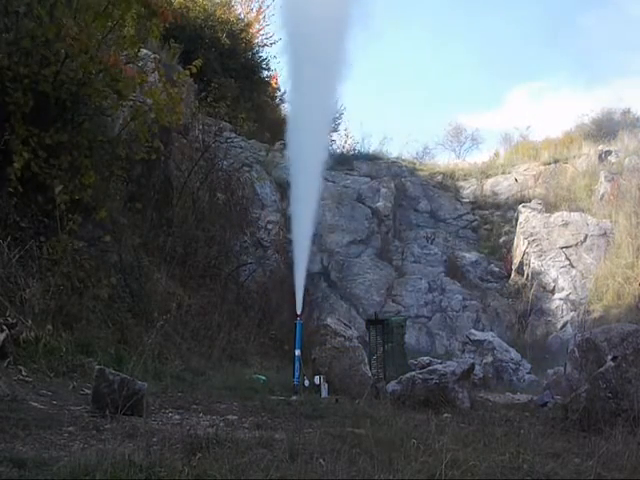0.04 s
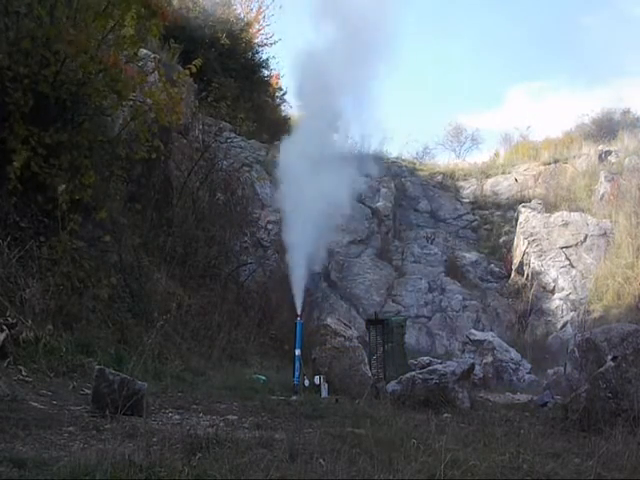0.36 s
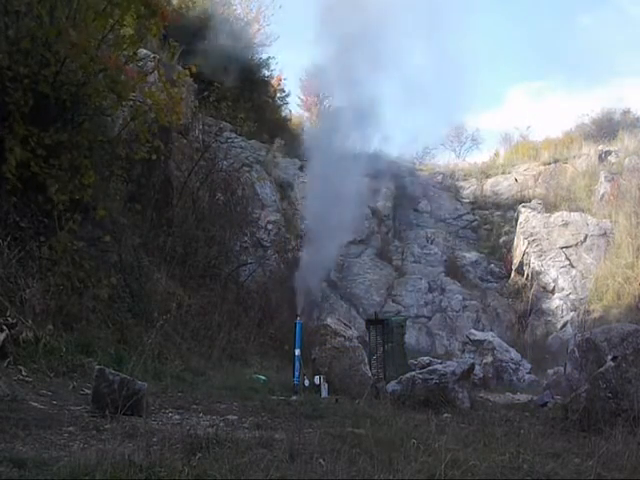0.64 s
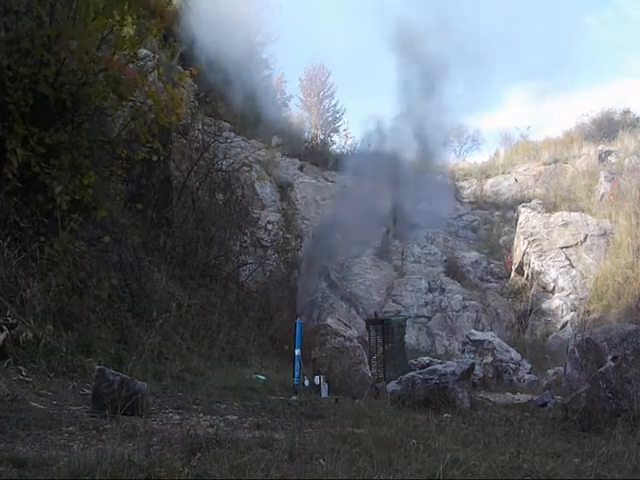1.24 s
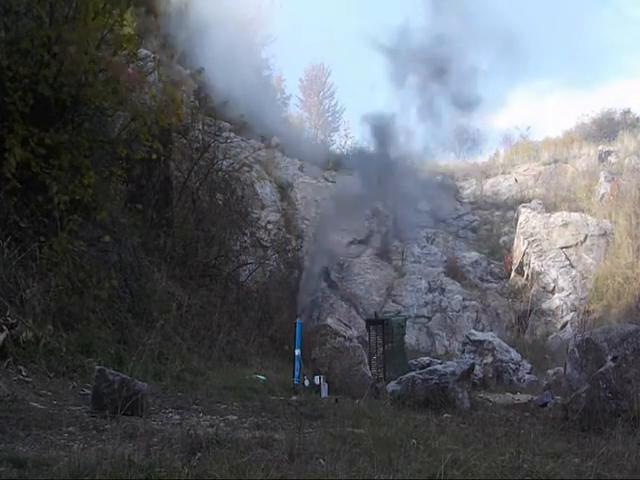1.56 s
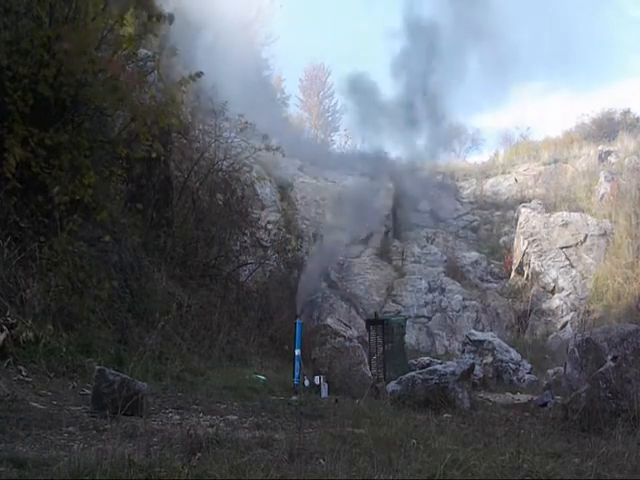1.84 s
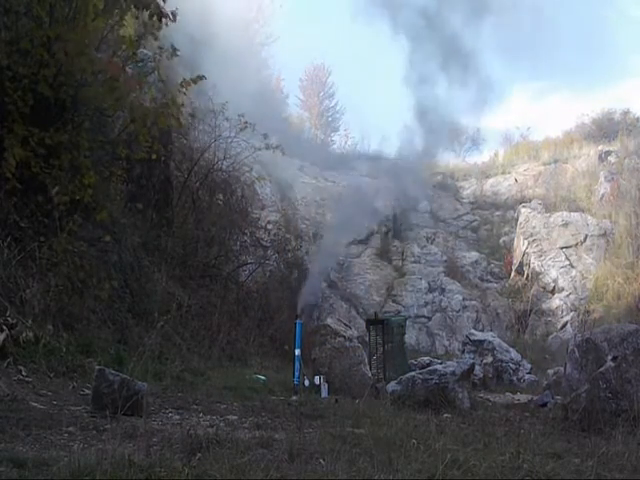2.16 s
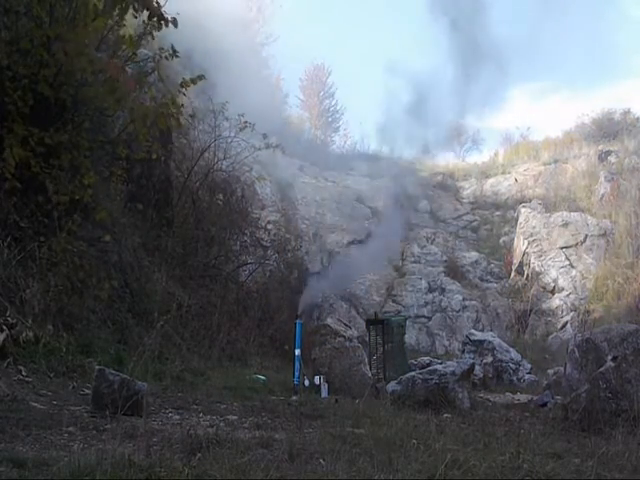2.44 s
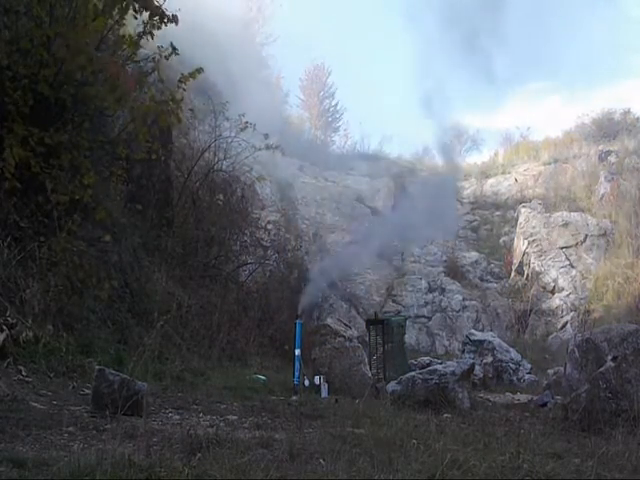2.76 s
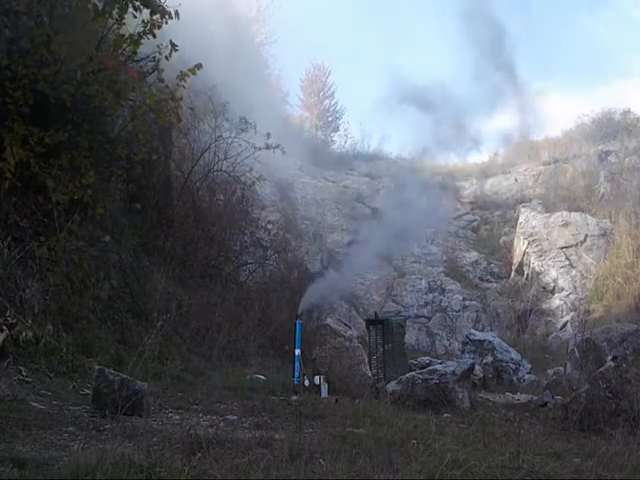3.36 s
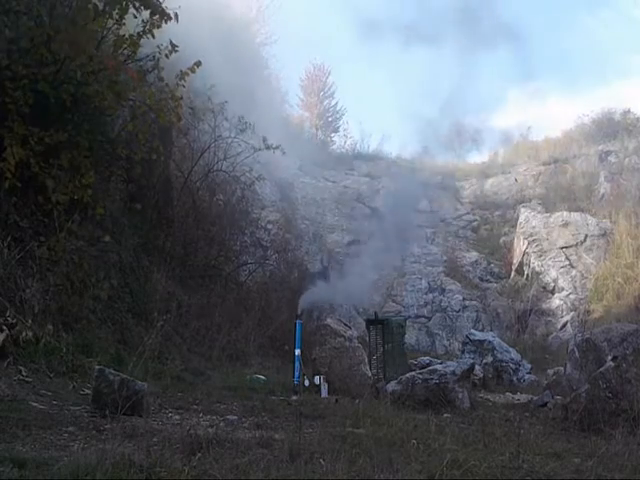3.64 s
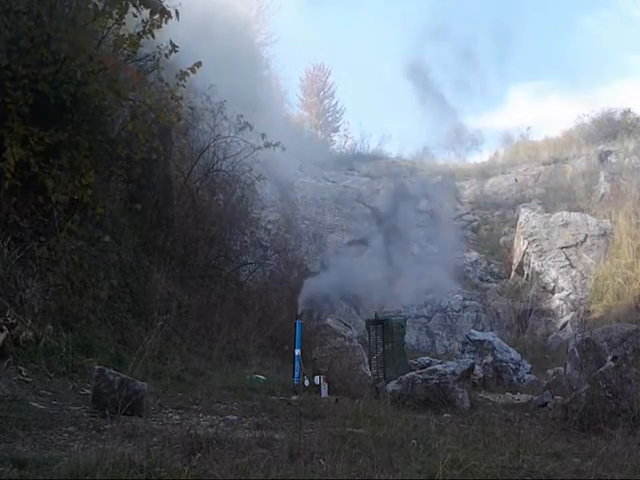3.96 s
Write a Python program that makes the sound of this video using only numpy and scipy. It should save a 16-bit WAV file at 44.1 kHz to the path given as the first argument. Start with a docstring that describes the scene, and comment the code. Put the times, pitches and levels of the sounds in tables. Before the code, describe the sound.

A small rocket motor roars for an instant, overloading the microphone, then drops to a wet, spitting spray. Vapour hisses on in weakening surges with dull puffs, a thin whistle and one quick knock, outdoors in a quarry.

```python
"""A small rocket motor, clamped nozzle-up in a quarry, blows down its tank.
Its jet roars, crackles with small shocks and overloads the microphone. The last liquid sprays
through the ringing nozzle, then vapour hisses out, sounding the hollow tube, with a thin whistle.
Low puffs and sharp spits break through, and something gives one quick double knock.
Ground and rock faces throw the jet and the knock back, over faint air and a low drone."""
import sys
import numpy as np
from scipy import signal
from scipy.fft import rfft, irfft
from scipy.io import wavfile

SR = 44100
rng = np.random.default_rng(int(sys.argv[2]) if len(sys.argv) > 2 else 0)


def wav_out(sig):
    """Save sig, one row per channel (or a flat mono array), as 16-bit PCM at SR to the path in sys.argv[1]."""
    wavfile.write(sys.argv[1], SR, np.round(np.clip(np.atleast_2d(sig).T, -1, 1) * 32767).astype(np.int16))


N = 176400
TIME_S = np.arange(N) / SR

# Full thrust: t/s, level/dB
THRUST_ENVELOPE = [(0, 0), (.04, -2), (.052, -3), (.064, -10.5), (.072, -4.5), (.135, -2), (.157, -9.5),
                   (.166, -2.5), (.228, -2.5), (.243, -16), (.27, -20), (.32, -36), (.38, -78)]
# Jet spectrum: f/Hz, level/dB
THRUST_SPECTRUM = [(24, -22), (40, -4), (98, -0.5), (212, -1.5), (247, -8.5), (333, -3.5), (472, -8),
                   (738, -4.5), (816, -5), (1050, -5.5), (1160, -4), (1520, -5), (1900, -7.5), (3060, -1.5),
                   (3290, -5), (4670, -3.5), (5420, -8), (6300, -2.5), (7680, -7), (9620, 0.5),
                   (15400, -18)]
# Deep body: t/s, level/dB
SURGE_ENVELOPE = [(0, -32), (.13, -34), (.158, -21), (.172, -7), (.2, -4.5), (.228, -9.5), (.25, -19),
                  (.3, -67)]
# Body spectrum: f/Hz, level/dB
SURGE_SPECTRUM = [(60, -6), (300, -9), (500, -23), (730, 2), (900, -4), (1400, -2), (1900, -10), (3000, -5),
                  (6000, -18)]
def roar():
    """The jet at full thrust crackles with small shocks and deepens in its last surge."""
    jet = turbulence(pops_per_s=1100, spread_db=0.5, pop_db=-6.5, flutter_db=1.77, flutter_hz=77)
    body = turbulence(pops_per_s=400, spread_db=3, pop_db=0, flutter_db=1.8, flutter_hz=80)
    thrust = colour(jet, THRUST_SPECTRUM) * amp(curve(THRUST_ENVELOPE))
    surge = colour(body, SURGE_SPECTRUM) * amp(curve(SURGE_ENVELOPE))
    return thrust + surge


# Wet spray: t/s, level/dB
SPRAY_ENVELOPE = [(.2, -56), (.26, -23.5), (.36, -24.5), (.41, -29.5), (.46, -29.5), (.515, -22),
                  (.57, -20), (.62, -24.5), (.672, -29.5), (.686, -43), (.75, -49), (.9, -75)]
# Spray spectrum: f/Hz, level/dB
SPRAY_SPECTRUM = [(180, -31), (300, -9), (390, -5), (474, -4.5), (726, -17), (801, -11), (928, -7),
                  (1190, -10.5), (1520, -6.5), (1790, -9), (2920, 0.5), (3380, -3), (4620, -3), (5350, -8),
                  (6000, 0.5), (7790, -7), (9640, -1), (13800, -14.5), (15000, -20)]
# Nozzle resonance: t/s, f/Hz, level/dB
NOZZLE_RING = [(.28, 3100, -40), (.37, 2980, -34), (.41, 2880, -34), (.48, 2850, -31.5), (.53, 2900, -49),
               (.62, 2750, -35), (.67, 2700, -37), (.72, 2700, -60)]
def spray():
    """The last liquid spits through the nozzle and makes it ring."""
    jet = turbulence(pops_per_s=1400, spread_db=-1, pop_db=-2, flutter_db=1.9, flutter_hz=76)
    spatter = highpass(colour(jet, SPRAY_SPECTRUM), hz=200)
    ring = narrowband(curve(NOZZLE_RING), width_hz=380) * amp(curve(NOZZLE_RING, column=2))
    return spatter * amp(curve(SPRAY_ENVELOPE)) + ring


# Vapour jet: t/s, level/dB, treble gain/dB
VAPOUR_ENVELOPE = [(.5, -32, 12.5), (.7, -32, 3), (.8, -34, -0.5), (.92, -32.5, -1), (1.0, -29.5, -1.5),
                   (1.11, -27, -2), (1.17, -28.5, -0.5), (1.3, -29.5, -0.5), (1.42, -32, -1.5),
                   (1.61, -31, -3.5), (1.66, -34, -3.5), (1.88, -35.5, -3), (1.98, -34.5, 1),
                   (2.08, -33.5, -1), (2.45, -36.5, -3), (2.9, -38, -2.5), (3.05, -39, -2.5),
                   (3.5, -40.5, -1.5), (4, -43.5, -3)]
# Hiss spectrum: f/Hz, level/dB
VAPOUR_SPECTRUM = [(120, -8), (200, -2.5), (298, -8.5), (350, 1), (550, -6), (734, -4.5), (849, -6),
                   (946, -6.5), (1130, -9.5), (1570, -7.5), (1780, -11), (2210, -10), (2600, -3),
                   (2900, -2), (3350, -3), (4160, -6), (4550, -3.5), (4890, -6.5), (5360, -15), (6080, -4),
                   (7690, -14.5), (8720, -6), (9900, -7.5), (11900, -15.5), (15000, -26.5)]
# Emptying tube: f/Hz, width/Hz, level/dB re jet at t = 0, fade/(dB/s)
TUBE_RESONANCES = [(737, 110, -16, 1), (1520, 130, -23, 1.5), (2645, 130, -19, 1), (2955, 170, -17, -0.5),
                   (3640, 62, -21.5, -1.5), (3870, 73, -19.5, -0.5), (4000, 59, -23.5, -2),
                   (4433, 140, -12, 1), (4755, 140, -9, 4.5)]
def vapour():
    """Vapour hisses out in surges as the pressure sinks and sounds the hollow tube."""
    jet = turbulence(pops_per_s=1200, spread_db=3, pop_db=-7, flutter_db=0.87, flutter_hz=23)
    hiss = highpass(colour(jet, VAPOUR_SPECTRUM), hz=110)
    treble_db = curve(VAPOUR_ENVELOPE, column=2) + 0.5 * wander(rate_hz=28)
    hiss += highpass(hiss, hz=6000, order=3) * (amp(treble_db) - 1)
    tube = sum(amp(db - fade * TIME_S) * narrowband(hz, width_hz)
               for hz, width_hz, db, fade in TUBE_RESONANCES)
    return (hiss + tube) * amp(curve(VAPOUR_ENVELOPE))


# Leak whistle: t/s, level/dB
WHISTLE_ENVELOPE = [(1.4, -68), (2.0, -55.5), (2.6, -53.5), (3.3, -53.2), (4, -53.7)]
def whistle():
    """The leak whistles thinly in two close bands."""
    bands = narrowband(hz=9523, width_hz=48) + narrowband(hz=9598, width_hz=48)
    return unit(bands) * amp(curve(WHISTLE_ENVELOPE))


# Gusts: t/s, decay/s, level/dB
PUFF_EVENTS = [(0.312, 0.016, -29), (0.381, 0.016, -29.5), (0.402, 0.018, -27.5), (0.471, 0.014, -30),
               (0.499, 0.011, -21.5), (.533, .025, -27), (0.567, 0.017, -30), (0.694, 0.017, -30),
               (0.735, 0.014, -26), (.761, 0.015, -27), (.79, .05, -36), (0.908, 0.01, -34),
               (1.207, 0.13, -33), (1.339, 0.046, -39.5), (1.52, 0.068, -37.5), (1.954, 0.078, -39.5),
               (2.095, 0.042, -36.5), (2.295, .04, -41), (2.704, .06, -50), (2.936, 0.013, -38),
               (3.412, 0.052, -41.5), (3.553, 0.086, -48)]
# Gust spectrum: f/Hz, level/dB
PUFF_SPECTRUM = [(15, 4), (35, -3.5), (80, 1.5), (180, 0), (350, -6), (800, -23), (2000, -47), (6000, -80)]
def puffs(rise_s=0.0021):
    """Short dull gusts of gas leave the nozzle."""
    envelope = np.zeros(N)
    for start_s, decay_s, db in PUFF_EVENTS:
        age_s = since(start_s)
        envelope += amp(db) * np.minimum(age_s / rise_s, 1) * np.exp(-(age_s / decay_s) ** 2)
    return envelope * noise(PUFF_SPECTRUM)


# Liquid spits: t/s, peak level/dB
SPIT_EVENTS = [(0.504, -15), (.699, -24), (0.7359, -25), (0.767, -20), (.915, -30)]
def spits(rise_s=0.0003):
    """Each spit of liquid leaving the nozzle is one sharp pressure pulse."""
    pulses = np.zeros(N)
    for start_s, db in SPIT_EVENTS:
        progress = since(start_s) / rise_s
        pulses += amp(db) * progress * np.exp(1 - progress)
    return pulses


# Contacts: t/s, level/dB
KNOCK_CONTACTS = [(2.9314, -29), (2.9348, -36)]
# Struck modes: f/Hz, level/dB re contact, T60/s
KNOCK_RESONANCES = [(800, -9, .025), (1100, -3.5, .03), (1400, -9, .02), (2180, -4, 0.022),
                    (2480, 0, 0.014), (3180, -4, 0.033)]
# Contact crack: f/Hz, level/dB
CRACK_SPECTRUM = [(400, -15), (900, 0), (3400, 0), (4500, -10), (9000, -25)]
def knock(crack_db=-9.5, crack_decay_s=0.0054):
    """Two quick contacts crack and ring a few damped modes."""
    out = np.zeros(N)
    crack = amp(crack_db) * noise(CRACK_SPECTRUM)
    for start_s, db in KNOCK_CONTACTS:
        age_s = since(start_s)
        out += amp(db) * crack * (age_s > 0) * np.exp(-age_s / crack_decay_s)
        for hz, mode_db, t60_s in KNOCK_RESONANCES:
            out += amp(db + mode_db - 60 * age_s / t60_s) * np.sin(2 * np.pi * hz * age_s)
    return out


# Stirred air: t/s, level/dB
RUMBLE_ENVELOPE = [(0, -19.5), (.22, -27), (.28, -57), (1.1, -46.5), (1.35, -39), (1.7, -47.5),
                   (2.2, -41.5), (2.35, -42), (2.6, -42), (2.76, -39), (2.95, -38.5), (3.15, -52.5),
                   (3.5, -44.5), (4, -50.5)]
# Rumble spectrum: f/Hz, level/dB
RUMBLE_SPECTRUM = [(8, -3.5), (25, -0.5), (60, -6), (110, -13), (250, -21), (1000, -70)]
def rumble():
    """Stirred air rumbles under the jet."""
    return amp(curve(RUMBLE_ENVELOPE)) * noise(RUMBLE_SPECTRUM)


# Still quarry air: f/Hz, level/dB
AIR_SPECTRUM = [(30, 2), (200, -4.5), (500, -9.5), (1500, -17), (4000, -24), (8000, -26), (15000, -19)]
# Low drone: t/s, level/dB
DRONE_ENVELOPE = [(2.8, -66), (3.3, -56), (3.7, -54.5), (4, -58)]
def background():
    """Faint steady outdoor air, and a low drone that swells near the end."""
    air = amp(-48.5) * noise(AIR_SPECTRUM)
    drone = amp(curve(DRONE_ENVELOPE)) * narrowband(hz=142, width_hz=19)
    return air + drone


def amp(db):
    """Decibels to gain."""
    return 10 ** (np.asarray(db) / 20)


def since(start_s):
    """Seconds since an onset, zero before it."""
    return np.maximum(TIME_S - start_s, 0)


def curve(table, column=1):
    """One table column, linearly interpolated in time."""
    rows = np.array(table, float)
    return np.interp(TIME_S, rows[:, 0], rows[:, column])


def unit(x):
    """Scale to rms 1."""
    return x / np.sqrt(np.mean(x ** 2))


def bin_hz():
    """Bin frequencies, floored at 1 Hz."""
    return np.maximum(np.arange(N // 2 + 1) * SR / N, 1)


def response(table):
    """Gain per bin from f/Hz, level/dB points."""
    rows = np.array(table, float)
    return amp(np.interp(np.log(bin_hz()), np.log(rows[:, 0]), rows[:, 1]))


def colour(x, spectrum):
    """Filter by a spectral shape, then scale to rms 1."""
    return unit(irfft(rfft(x) * response(spectrum), N))


def noise(spectrum):
    """Coloured Gaussian noise, rms 1."""
    return colour(rng.standard_normal(N), spectrum)


def highpass(x, hz, order=2):
    """Zero-phase high-pass."""
    return irfft(rfft(x) / (1 + (hz / bin_hz()) ** (2 * order)), N)


def wander(rate_hz):
    """Low-passed random motion, rms 1."""
    return unit(irfft(rfft(rng.standard_normal(N)) / (1 + (bin_hz() / rate_hz) ** 4), N))


def narrowband(hz, width_hz):
    """Noise in a sharp resonance whose centre may move, rms 1."""
    phase = 2 * np.pi * np.cumsum(hz * np.ones(N)) / SR
    return unit(wander(width_hz / 2) * np.cos(phase) + wander(width_hz / 2) * np.sin(phase))


def turbulence(pops_per_s, spread_db, pop_db, flutter_db, flutter_hz):
    """Smooth mixing noise plus sharp pops of uneven size, fluttering together."""
    sizes = amp(spread_db * np.minimum(rng.exponential(size=N), 2.5))
    pops = (rng.random(N) < pops_per_s / SR) * rng.choice([-1, 1], N) * sizes
    flow = rng.standard_normal(N) + amp(pop_db) * unit(pops)
    return flow * amp(flutter_db * wander(flutter_hz))


def ground_echo(x, delay_s=0.00313, gain=0.17):
    """One reflection off the ground."""
    return gain * np.interp(TIME_S - delay_s, TIME_S, x, left=0)


def scatter(x, t60_s, gap_s):
    """Dense decaying reflections with unit energy gain."""
    t = TIME_S[:SR]
    tail = rng.standard_normal(SR) * amp(-60 * t / t60_s) * (t > gap_s)
    return signal.fftconvolve(x, tail / np.sqrt(np.sum(tail ** 2)))[:N]


# Side signal at the microphone ports: f/Hz, level/dB re mid
SIDE_RESPONSE = [(2450, -31.5), (2850, -14), (3300, -12), (4100, -11.5), (4600, -7.5), (5300, -10),
                 (6000, -6), (8000, -3.5), (10500, -1), (13000, 2.5), (15500, 5)]
def stereo_ports(mid, diffuse, diffuse_gain=0.52):
    """Two close ports differ by the mid signal in quadrature plus diffuse sound."""
    quadrature = -1j * np.sqrt(1 - diffuse_gain ** 2) * rfft(mid)
    side = irfft(response(SIDE_RESPONSE) * (quadrature + diffuse_gain * rfft(diffuse)), N)
    return np.array([mid + side, mid - side])


def scene():
    """Motor, knock, reflections and background, in stereo."""
    jet = roar() + spray() + vapour() + whistle()
    near = jet + ground_echo(jet) + knock()
    rock_faces = amp(-17) * scatter(near, t60_s=0.35, gap_s=0.012)
    mid = near + rock_faces + puffs() + spits() + rumble() + background()
    return stereo_ports(mid, diffuse=scatter(near, t60_s=0.16, gap_s=0.006))


CLIP_LEVEL, LOW_SIDE_GAIN, CROSSOVER_HZ, TOP_HZ = 1.21, 0.2, 2300, 15650
def record(dry):
    """Overload clips the roar flat; the lows are narrowed to near mono and the top is cut."""
    left, right = np.clip(dry, -CLIP_LEVEL, CLIP_LEVEL)
    mid, side = (left + right) / 2, (left - right) / 2
    side = LOW_SIDE_GAIN * side + (1 - LOW_SIDE_GAIN) * highpass(side, CROSSOVER_HZ, order=6)
    lowpass = signal.firwin(401, TOP_HZ, fs=SR)
    return signal.fftconvolve(np.array([mid + side, mid - side]), lowpass[None], mode="same", axes=1)


dry = scene()
out = record(dry)
wav_out(out)
```